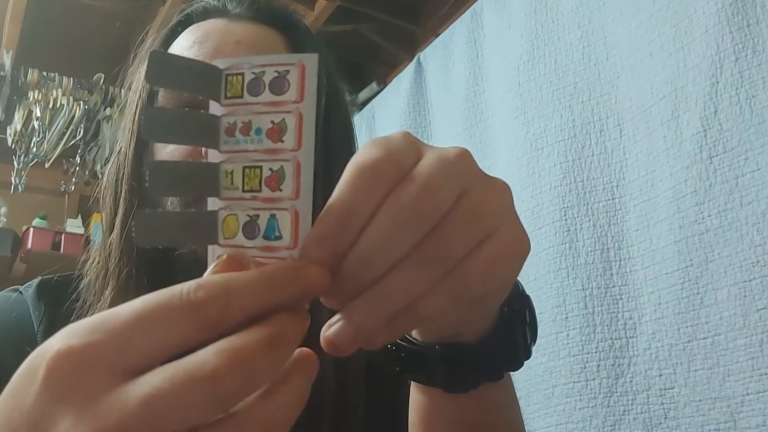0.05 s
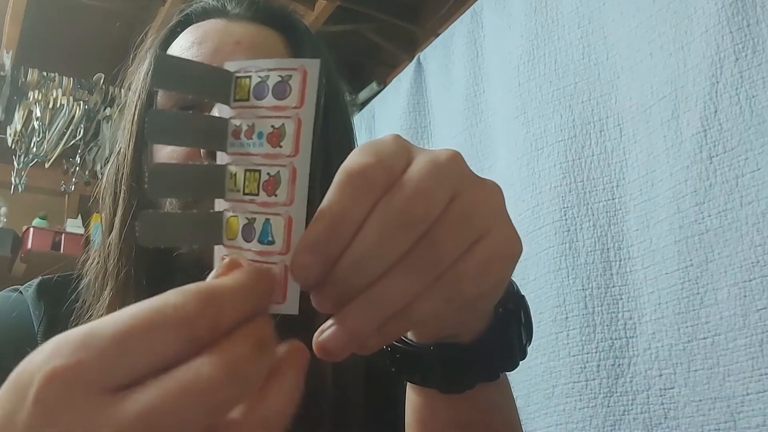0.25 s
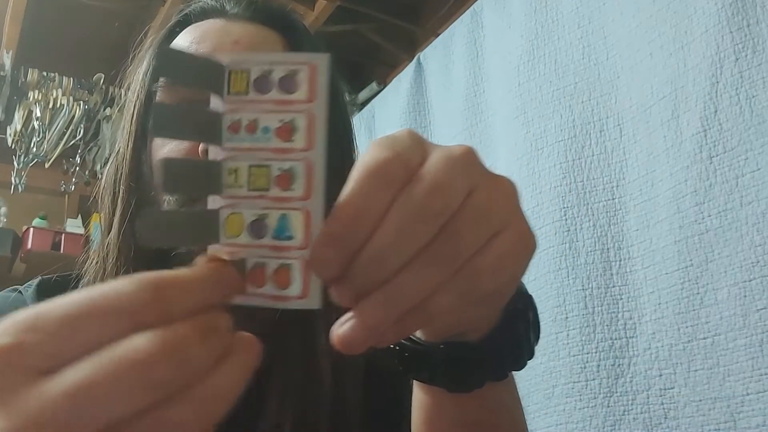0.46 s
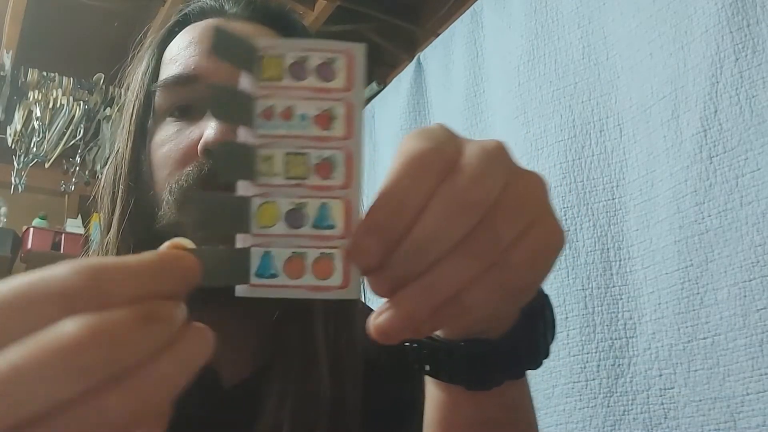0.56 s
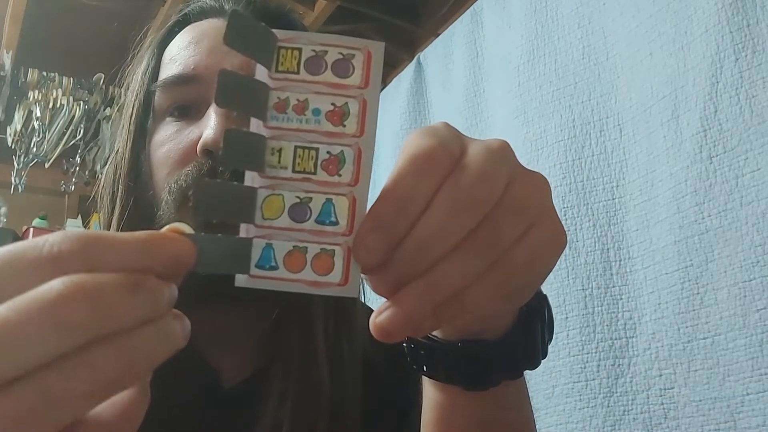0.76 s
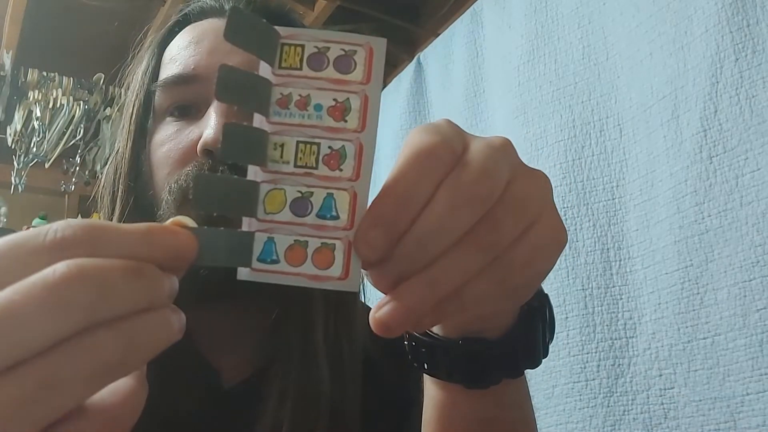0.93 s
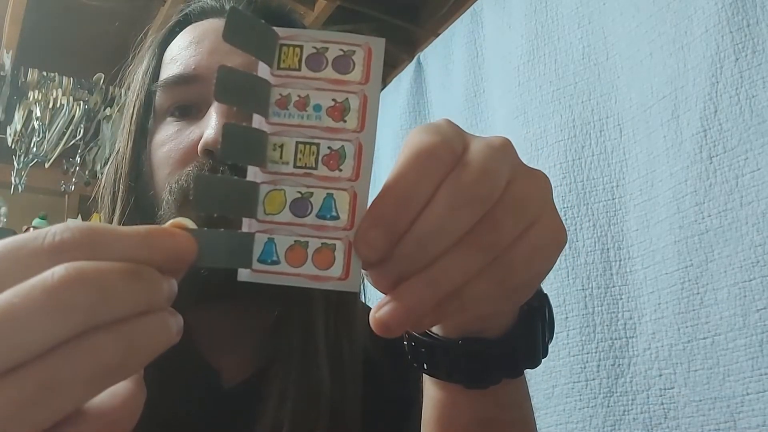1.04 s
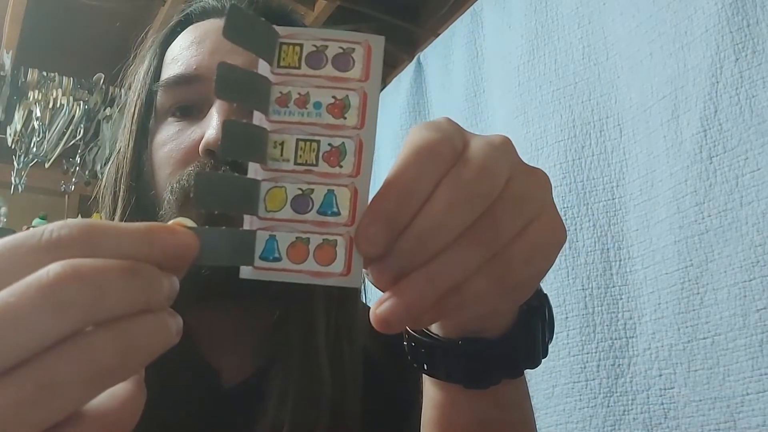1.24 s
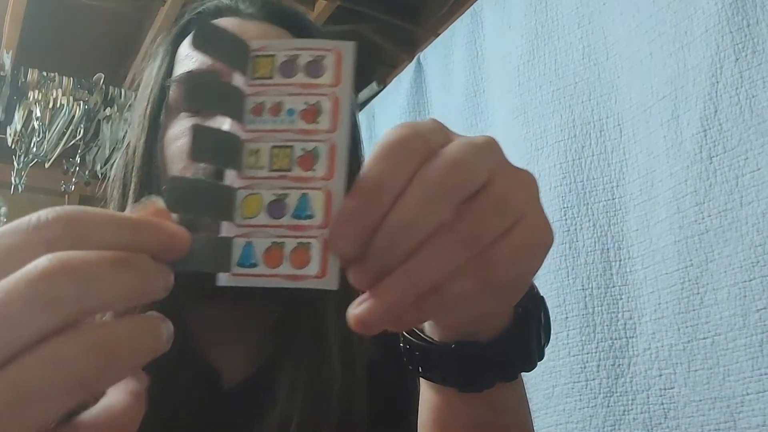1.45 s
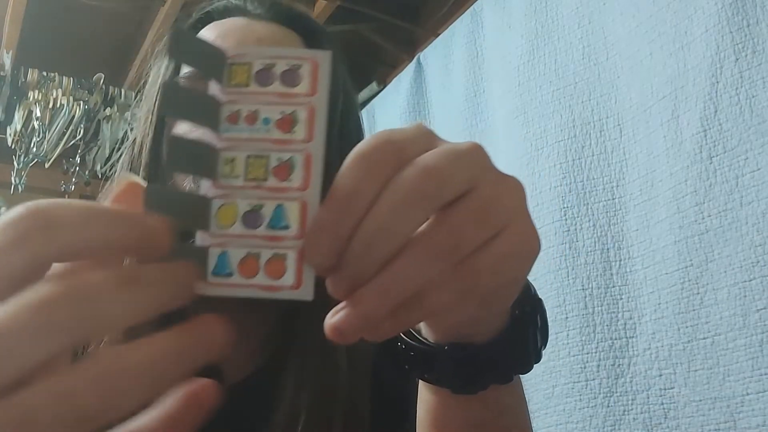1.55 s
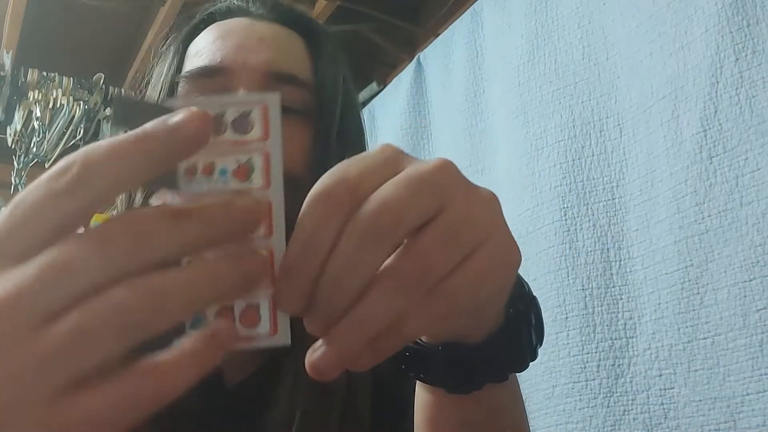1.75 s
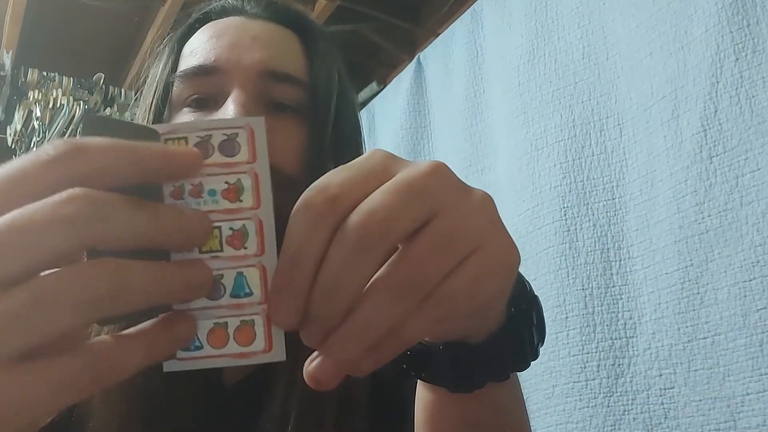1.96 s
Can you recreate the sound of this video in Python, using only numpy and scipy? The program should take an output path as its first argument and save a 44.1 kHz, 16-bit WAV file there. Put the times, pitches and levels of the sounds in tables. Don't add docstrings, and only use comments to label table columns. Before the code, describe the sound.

Tabs of a small card ticket are torn by hand, very close. A light tick comes near 0.12 seconds, then sharp crackling snaps at 0.2-0.25. A second rip snaps at 0.4-0.44 and 0.49-0.52, with slight skin friction between and a hollow card flex. Short small-room reflections follow. Quiet low hum and faint hiss remain until soft fingers brush the card around 1.82-2 seconds.

```python
import sys
import numpy as np
from scipy import signal
from scipy.fft import rfft, irfft, next_fast_len
from scipy.io import wavfile
from scipy.ndimage import uniform_filter1d

SR = 44100
rng = np.random.default_rng(int(sys.argv[2]) if len(sys.argv) > 2 else 0)


def master_out(mix):
    frames = np.transpose(np.atleast_2d(mix))
    ceiling = np.clip(frames, -1, 1)
    pcm = np.round(ceiling * 32767).astype(np.int16)
    wavfile.write(sys.argv[1], SR, pcm)


def voltage_ratio(level):
    return 10 ** (np.asarray(level, float) / 20)


N = 88200


def unit(x):
    return x / np.sqrt(np.mean(x ** 2) + 1e-20)


def along(points, hz):
    f, v = np.transpose(points)
    return np.interp(np.log(hz + 1), np.log(f + 1), v)


def filtered(x, response):
    m = next_fast_len(2 * x.shape[-1])
    return irfft(rfft(x, m) * response(np.fft.rfftfreq(m, 1 / SR)), m)[..., :x.shape[-1]]


def ringing(rows, scatter_db, pitch=1):
    def response(f):
        total = 0
        for k, (centre, width, *dbs) in enumerate(rows):
            gain = (-1) ** k * voltage_ratio(np.array(dbs) + scatter_db[k])[:, None]
            damping = 1j * f * width
            total = total + gain * damping / ((centre * pitch) ** 2 - f * f + damping)
        return total
    return response


def rush(spectrum, alike, patchy_db):
    z = signal.stft(rng.standard_normal((2, N)), nperseg=512)[2]
    patches = uniform_filter1d(rng.standard_normal(z.shape[1:]), size=5, axis=0)
    patches = uniform_filter1d(patches, size=5, axis=1)
    pair = signal.istft(z * voltage_ratio(patchy_db * unit(patches)), nperseg=512)[1][:, :N]

    def spread(hz):
        turn = np.arccos(np.clip(along(alike, hz), -1, 1)) / 2
        return voltage_ratio(along(spectrum, hz)) * [np.cos(turn), np.sin(turn)]

    mid, side = filtered(pair, spread)
    return unit(np.array([mid + side, mid - side]))


def crackle(density, count):
    sizes = voltage_ratio(9 * rng.uniform(-1.6, 1, (3, count))) * rng.choice([-1, 1], (3, count))
    cracks = sizes * (rng.random((3, count)) < density)
    share = 0.8
    return share * cracks[0] + np.sqrt(1 - share ** 2) * cracks[1:]


def room():
    # frequency in Hz, level in dB per Hz
    hum_tone = [(30, -16.5), (60, -9), (130, -0.5), (200, -6.5), (430, -14), (620, -25.5), (900, -25),
                (1800, -45)]
    # frequency in Hz, level in dB per Hz
    hiss_tone = [(500, -10.5), (1500, 0.5), (4000, -2.5), (8000, -9.5), (11500, -8), (12500, -17.5),
                 (16000, -30.5)]
    # frequency in Hz, likeness from 0 to 1
    hum_likeness = [(60, 1), (200, .93), (350, 0.95), (550, .3), (800, .6), (1200, 0.067), (3000, .1)]
    hum_db = np.array([[-58], [-58 + 1.5]])
    hum = voltage_ratio(hum_db) * rush([*hum_tone, (4000, -84)], hum_likeness, patchy_db=-1.5)
    return hum + voltage_ratio(-82.5) * rush([(200, -40), *hiss_tone], [(1000, .1)], patchy_db=.3)


def fingers():
    # start in seconds, rise in seconds, hold in seconds, fall in seconds, level in dB
    strokes = [
        (0, 0.0055, 0.021, 0.024, -78.5),
        (0.094, 0.018, 0.0066, .03, -67),
        (0.437, .01, .04, 0.018, -63.5),
        (0.311, .01, 0.0193, 0.018, -77.5),
        (1.39, 0.015, 0.015, 0.079, -78.5),
        (1.455, 0.028, 0.05, 0.019, -84),
        (1.824, 0.0086, 0.013, 0.024, -75.5),
        (1.851, 0.0096, 0.014, 0.029, -62.5),
        (1.88, 0.053, 0.018, 0.15, -61),
        (1.959, 0.034, .05, .02, -74),
    ]
    # frequency in Hz, level in dB per Hz
    skin_tone = [(600, -9), (1100, -10.5), (1700, -11.5), (2800, 0), (5000, 0), (8000, 11.5), (12200, -3.5),
                 (13200, -12)]
    # frequency in Hz, width in Hz, level in dB
    tab_modes = [(1020, 370, -10.5), (2789, 89, 2.5), (3790, 160, -2), (4890, 260, 3.5), (6140, 220, -2.5),
                 (7958, 580, 0), (10466, 350, 1), (12050, 500, -2)]
    t = np.arange(N) / SR
    stroke = 0
    for start, rise, hold, fall, db in strokes:
        stroke = stroke + voltage_ratio(db) * np.interp(t, np.cumsum([start, rise, hold, fall]), [0, 1, 1, 0]) ** 2
    grain = voltage_ratio(1.6 * unit(uniform_filter1d(rng.standard_normal(N), size=130)))
    slide = unit(grain * rush(skin_tone, [(2500, 0.98), (7000, 0.17)], patchy_db=-2.0))
    catches = crackle(5300 / SR, count=N)
    grit = filtered(catches, ringing(tab_modes, np.zeros((8, 2))))
    grit = filtered(grit, lambda hz: voltage_ratio(np.minimum(along(skin_tone[-2:], hz) - skin_tone[-2][1], 0)))
    return stroke * (slide + voltage_ratio(-1) * unit(grain * grit))


def walls(x):
    # frequency in Hz, time to fall 60 dB in seconds
    decay = [(250, .18), (1000, .12), (4000, .14), (9000, .12), (12000, .1), (14000, 0.056)]
    # frequency in Hz, level in dB
    answer_tone = [(300, 2), (1000, 0.5), (4000, 0), (12000, 2.5)]
    level_db, onset_ms = -11, 5
    hz, t, z = signal.stft(rng.standard_normal((2, SR // 4)), SR, nperseg=128)
    fade_db = along(answer_tone, hz)[:, None] - 60 * t / along(decay, hz)[:, None]
    fade = voltage_ratio(fade_db) * np.clip(t * 1000 / onset_ms, 0, 1)
    tail = signal.istft(z * fade, SR, nperseg=128)[1]
    return voltage_ratio(level_db) * signal.fftconvolve(x, tail / np.linalg.norm(tail[0]), axes=1)


def tearing():
    # time in seconds, then levels in dB of the dull cracks, bright cracks,
    # hissing cracks and card ring
    bridges = [(.018, -71.5, -65, -95, -76), (.029, -75, -75, -78, -77), (.1227, -42.5, -36, -45.5, -56),
               (.2068, -38, -40, -35, -58), (.2138, -21, -64, -26.5, -33.5),
               (.228, -26.5, -25.5, -30, -29.5), (.241, -30, -23.5, -20.5, -23.5),
               (.325, -66, -66, -73, -61.5), (.3965, -58, -53, -59, -69), (.414, -36.5, -39, -48, -47.5),
               (.4184, -24.5, -26, -30.5, -29.5), (.4386, -31.5, -33, -35.5, -21.5),
               (.492, -40, -35, -41, -49), (.4985, -21.5, -25, -32, -23), (.5188, -25, -20.5, -19.5, -27),
               (.815, -88, -77, -78, -92), (1.823, -63.5, -68, -76, -76), (1.852, -64.5, -75, -89, -76),
               (1.861, -59.5, -57, -85, -63), (1.876, -59, -56.5, -93, -60), (1.938, -56.5, -72, -71, -82)]
    # frequency in Hz, width in Hz, level in dB
    dull = [(1440, 292, -10.5), (1994, 460, -5.5), (2717, 280, -1), (3655, 500, 1), (4400, 650, 1.5),
            (5240, 480, -1)]
    # frequency in Hz, width in Hz, level in dB
    bright = [(6133, 1800, -4), (7400, 1300, 1), (9150, 470, -2)]
    # frequency in Hz, width in Hz, level in dB
    hissing = [(11025, 2700, 11), (15120, 500, -11)]
    # frequency in Hz, width in Hz, left level in dB, right level in dB
    bending = [(230, 40, -15, -20), (760, 190, -18, -5), (990, 90, -3.5, .5), (1480, 260, -19, -21)]
    # time in seconds, pitch factor, level of the low modes in dB
    flap = [(0.212, 1.024, -10), (0.251, 1.024, -6), (0.419, 0.99, -0.5), (.52, .99, 2)]
    burst_ms, settle_ms, crack_gap_ms = 2.2, 0.98, 0.098
    fray_db, fray_ms = -15, 4.5
    lead_db = 7
    scatter_db, bend_scatter_db = 3.5, -0.7
    out = np.zeros((2, N + SR))
    ms = np.arange(SR // 20) * 1000 / SR
    first = SR // 400
    times, pitches, lows = np.transpose(flap)
    for s, *levels in bridges:
        burst = np.exp(-ms / (1.5 * burst_ms) - np.maximum(ms - burst_ms, 0) / settle_ms)
        shape = burst + voltage_ratio(fray_db) * np.exp(-ms / fray_ms)
        cracks = shape * crackle(1000 / SR / crack_gap_ms, count=len(ms)) - voltage_ratio(lead_db) * (ms == 0)
        push = -ms * np.exp(-ms / 0.037) * np.ones((2, 1))
        luck = rng.standard_normal((4, 8, 2))
        low_tilt = np.array([[1], [1], [0], [-1]])
        bend_db = bend_scatter_db * luck[3, :4] + np.interp(s, times, lows) * low_tilt
        parts = [(cracks, ringing(rows, scatter_db * luck[k])) for k, rows in enumerate([dull, bright, hissing])]
        parts += [(push, ringing(bending, bend_db, np.interp(s, times, pitches)))]
        snap = 0
        for db, (drive, body) in zip(levels, parts):
            sound = filtered(drive / np.linalg.norm(drive, axis=1, keepdims=True), body)
            snap = snap + voltage_ratio(db - 1) * sound / np.sqrt(np.mean(sound[:, :first] ** 2))
        wet = walls(snap)
        at = round(s * SR)
        out[:, at:at + len(ms)] += snap
        out[:, at:at + wet.shape[1]] += wet
    return out[:, :N]


def scene():
    return tearing() + fingers() + room()


def band_limit(x):
    return signal.sosfilt(signal.butter(12, 16970, fs=SR, output="sos"), x)


def record(dry):
    # frequency in Hz, level in dB
    left_port = [(2000, 0), (4300, -2), (6000, 0), (7500, 1.5), (9400, -13), (11200, 0), (13200, -8),
                 (15200, -3)]
    # frequency in Hz, level in dB
    right_port = [(2000, 0), (4300, 2), (6000, 0), (8300, 0), (9900, -13), (11700, 3), (13200, -9),
                  (15200, -4)]
    # frequency in Hz, lag in radians
    right_lag = [(300, 0), (600, .5), (1100, 1.2), (2600, 0)]
    top_hz, low_cut_hz = 16800, 42
    late = 180

    def ports(hz):
        colour = voltage_ratio([along(left_port, hz), along(right_port, hz)])
        lag = np.exp([0 * hz, -1j * along(right_lag, hz)])
        return colour * lag * (hz < top_hz) * hz ** 6 / (hz ** 6 + low_cut_hz ** 6)

    left, right = filtered(dry, ports)
    right = np.concatenate([right[late:0:-1], right[:-late]])
    return band_limit(np.array([left, right]))


dry = scene()
out = record(dry)
master_out(out)
```